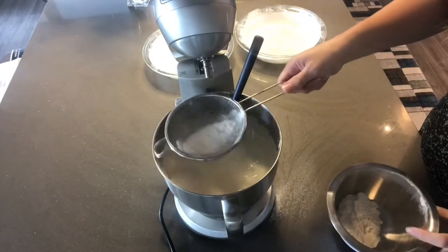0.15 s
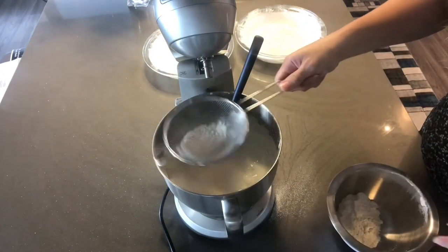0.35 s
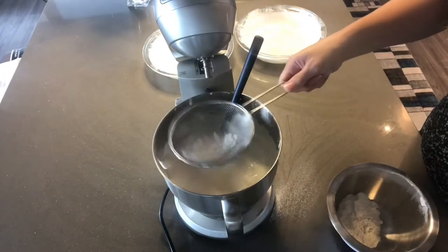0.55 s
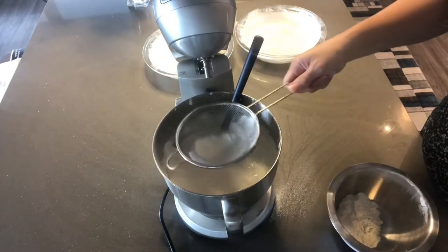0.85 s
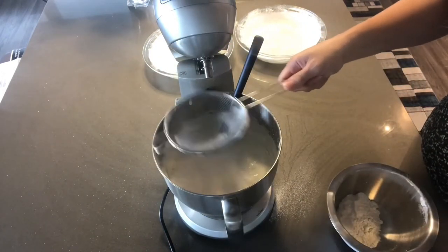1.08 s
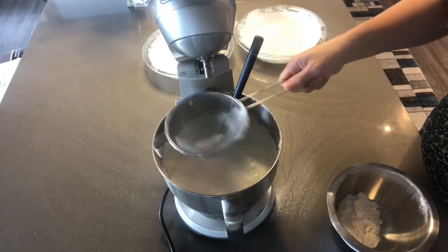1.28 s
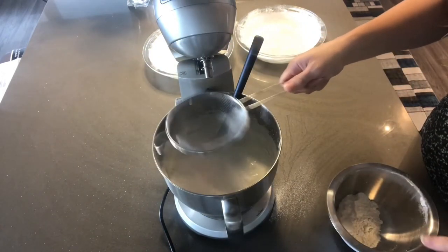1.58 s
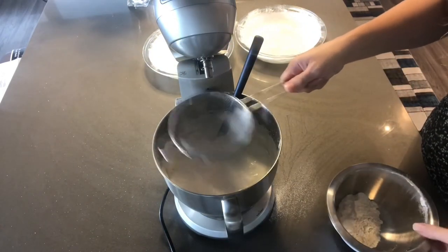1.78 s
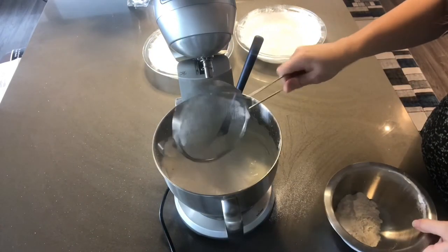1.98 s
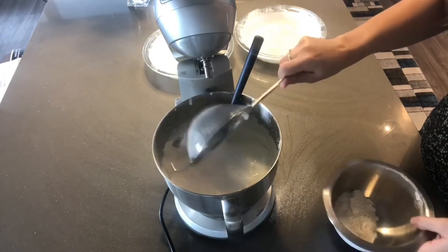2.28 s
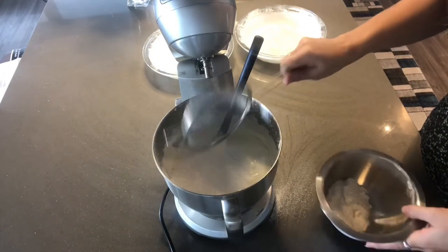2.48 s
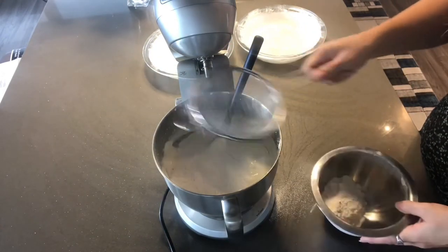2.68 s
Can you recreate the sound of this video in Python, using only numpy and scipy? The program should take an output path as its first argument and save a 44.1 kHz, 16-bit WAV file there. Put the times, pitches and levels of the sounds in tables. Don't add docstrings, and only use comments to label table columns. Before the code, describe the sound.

A metal sieve rim clacks hard on a steel mixing bowl, after very faint flour hiss and one lighter ring; a small bowl then slides and knocks on the worktop in a quiet, echoing kitchen, closely miked.

```python
import sys
import numpy as np
from scipy import signal
from scipy.fft import rfft, irfft
from scipy.io import wavfile
from scipy.ndimage import uniform_filter1d

SR = 44100
rng = np.random.default_rng(int(sys.argv[2]) if len(sys.argv) > 2 else 0)


def level_to_linear(level):
    exponent = np.asarray(level, float) / 20
    return 10 ** exponent


def wrap_up_sound(samples):
    columns = np.atleast_2d(samples).T
    tamed = np.clip(columns, -1, 1)
    steps = np.round(tamed * 32767).astype(np.int16)
    wavfile.write(sys.argv[1], SR, steps)


N = 125685

# [f/Hz, level/dB]
AIR_COLOUR = [(70, -3.5), (300, -4.5), (600, -12), (1400, -24.5), (7800, -32.5), (8300, -34.5),
              (14800, -39), (16200, -48.5)]
# [f/Hz, width/Hz, level/dB]
HUMS = [(124.76, 8.2, -66), (176.3, 9.2, -79), (271.1, 44, -65), (351.1, 73, -67.5),
        (405.06, 20, -67.5), (448.03, 16, -66.5), (853.9, 16, -72.5)]
# [f/Hz, time to fall 60 dB/s]
ROOM_ECHO = [(200, 0.32), (700, 0.527), (1400, 0.496), (2800, 0.468), (4000, 0.629), (6000, 0.387),
             (9000, 0.3), (14000, .2)]
# [t/s, level/dB, length/s, f/Hz, width/Hz]
BRUSHES = [
    (1.164, -63, 0.021, 5240, 2500),
    (1.429, -58.5, 0.0322, 3450, 6500),
    (1.852, -59.5, 0.0158, 2200, 1200),
    (1.918, -52, .012, 1990, 1400),
    (1.919, -58.5, .015, 5000, 4530),
]
# [t/s, level/dB, f/Hz, time to fall 60 dB/s]
TOUCHES = [
    (1.778, -59.5, 5400, 0.068),
    (1.78, -59, 5670, .05),
    (1.85, -47.5, 727.4, 0.098),
    (1.922, -49, 770.7, 0.1065),
    (2.81, -65, 4150, 0.051),
]
# [t/s, level/dB, f/Hz, time to fall 60 dB/s]
KNOCKS = [
    (2.618, -33, 1900, 0.013),
    (2.6203, -17.5, 510, 0.002),
    (2.625, -26, 1780, 0.004),
    (2.6253, -51, 3700, 0.0055),
    (2.619, -35, 1143, 0.0243),
    (2.6272, -31, 700, 0.0141),
    (2.628, -36, 1500, 0.0225),
    (2.6443, -33, 150, 0.0382),
]
# [t/s, level/dB, contact/ms]
SIEVE_HITS = [
    (1.7334, -28, 0.066),
    (1.7365, -56, 0.069),
    (1.754, -80.5, .1),
    (1.78, -54, 0.16),
]
# [f/Hz, level/dB, time to fall 60 dB/s]
SIEVE_MODES = [(546.2, -0.5, 0.021), (860, 1.5, 0.034), (947.3, 1, 0.0492), (1159, -4, 0.0695),
               (1468.4, -8.5, 0.165), (1884, -0.5, 0.0244), (3068, -7, 0.0287), (4012, 1.5, 0.067),
               (4620, -2, 0.033), (5300, -1.5, 0.034), (6384, -5, 0.0194), (8300, -0.5, 0.044),
               (9882, 2, 0.045), (10046, 3.5, 0.0236)]
# [t/s, level/dB, contact/ms]
CLACK_HITS = [
    (2.4065, -52.5, 0.073),
    (2.4291, -3, 0.044),
    (2.4308, -16, 0.19),
    (2.4378, -16, .1),
]
# [f/Hz, level/dB, time to fall 60 dB/s]
RIM_MODES = [(2708, -6.5, 0.033), (3538, -5.5, 0.0218), (4281, 1, 0.01877), (4744, -6.5, .015),
             (4975, 3, 0.0064), (5710, 7.5, 0.005), (7032, 6.5, 0.005), (7725, -6, 0.0225),
             (8804, -7, 0.0078), (9910, -4, 0.011), (11253, -18, 0.0045), (13190, -7, 0.0049),
             (14000, -17, 0.012), (15850, -12.5, 0.019)]
# [f/Hz, level/dB, time to fall 60 dB/s]
BODY_MODES = [(150, -29, 0.11), (470, -22, 0.13), (678, -28.5, 0.099), (728.8, -11.5, 0.058),
              (949.7, -34.5, .03), (1245, -20.5, 0.12), (1353.2, -6, 0.06), (1611, -33.5, 0.12),
              (1900, -22.5, 0.029), (2210, -8, 0.016)]
# [f/Hz, width/Hz, level/dB, time to fall 60 dB/s]
CRACK_BANDS = [(1500, 1600, -30.5, 0.055), (5000, 8600, -14, 0.012), (13500, 5200, -29.5, 0.0076)]
# [f/Hz, level/dB, time to fall 60 dB/s]
CLICK_MODES = [(700, -15, 0.01), (1500, -13, 0.012), (3132, 1, 0.0013), (4630, 3.5, 0.0011),
               (7190, 0, 0.0012), (9970, -1, 0.00072), (14500, -15, 0.0019)]


def unit(x):
    return x / np.sqrt(np.mean(x ** 2))


def band(hz, width_hz, order=1):
    f = np.fft.rfftfreq(N, 1 / SR) + 1
    distance = (f - hz * hz / f) / width_hz
    noise = rfft(rng.standard_normal(N))
    return unit(irfft(noise / (1 + distance ** (2 * order)), N))


def fade(t, t60):
    return (t >= 0) * np.exp(-np.log(1000) * np.maximum(t, 0) / t60)


def walk(rate):
    k = int(SR / rate)
    steps = np.repeat(rng.standard_normal(N // k + 1), k)
    return 2.4 * uniform_filter1d(uniform_filter1d(steps, k), k)[:N]


def ring(modes):
    t = np.arange(SR // 2) / SR
    return sum((-1) ** k * level_to_linear(db) * fade(t, t60) * np.sin(2 * np.pi * hz * t)
               for k, (hz, db, t60) in enumerate(modes))


def crowd(modes, spread, near_db):
    count = 5
    chance = rng.uniform(-0.76, 1, (len(modes), count, 2))
    steps = np.linspace(-1, 1, count)
    near = []
    for (hz, db, t60), row in zip(modes, chance):
        for j, (shift, lift) in enumerate(row):
            if j != count // 2:
                near_hz = hz * (1 + spread * (steps[j] * 2 + shift / count))
                near.append((near_hz, db + near_db + 3.283 * lift, t60 * 0.624))
    return ring(modes) + ring(near)


def strike(contacts, body):
    t = np.arange(N) / SR
    push = sum(level_to_linear(db) * np.exp(-((t - s) * 4000 / ms) ** 2) / (ms * SR / 2000) for s, db, ms in contacts)
    return signal.fftconvolve(push, body)[:N] / 2


def short_notes(t, rows):
    return sum(level_to_linear(db) * fade(t - s, t60) * np.sin(2 * np.pi * hz * (t - s)) for s, db, hz, t60 in rows)


def kitchen():
    f = np.log(np.fft.rfftfreq(N, 1 / SR) + 1)
    hz, db = np.transpose(AIR_COLOUR)
    air = irfft(rfft(rng.standard_normal(N)) * level_to_linear(np.interp(f, np.log(hz), db)), N)
    drone = sum(level_to_linear(level + 0.58 * walk(2.2)) * band(pitch, width) for pitch, width, level in HUMS)
    return level_to_linear(-55.5) * unit(air) + drone


def room(x):
    gap_s, tilt_db, level_db = 0.0044, -1.5, -9.5
    t = np.arange(N) / SR
    table_hz, table_t60 = np.transpose(ROOM_ECHO)
    tail = 0
    for k, hz in enumerate(140 * 2 ** np.arange(0, 7.5, .5)):
        t60 = np.interp(np.log(hz), np.log(table_hz), table_t60)
        tail = tail + level_to_linear(tilt_db * k / 2) * np.sqrt(hz) * band(hz, hz * 0.63) * fade(t - gap_s, t60)
    tail = tail[:SR] / np.sqrt(np.sum(tail ** 2))
    return level_to_linear(level_db) * signal.fftconvolve(x, tail)[:N]


def flour(t):
    shake_hz, first_shake_s, empty_s = 6.23, 0.111, 1.006
    shake_db = 2.5 * np.cos(2 * np.pi * shake_hz * (t - first_shake_s)) + 1.12 * walk(11.4)
    left = np.clip(1 - t / empty_s, 0, 1) ** 0.76
    return level_to_linear(-73.5 + shake_db) * left * band(6500, 3160, order=2)


def touches(t):
    scratches = 0
    for s, db, length, hz, width in BRUSHES:
        onset = np.clip((t - s) / 0.0026, 0, 1)
        scratches = scratches + level_to_linear(db) * band(hz, width, order=2) * fade(t - s, 6.23 * length) * onset
    return short_notes(t, TOUCHES) + scratches


def slide(t):
    start_s = 2.44
    swell = np.clip((t - start_s) / 0.013, 0, 1) * fade(t - start_s, 1.8)
    return level_to_linear(-44.5 + 1.0 * walk(30)) * swell * band(126, 170)


def small_bowl(t):
    return short_notes(t, KNOCKS)


def sieve(t):
    modes = [(hz, db, t60 if hz < 4300 else min(t60, .04)) for hz, db, t60 in SIEVE_MODES]
    fizz = level_to_linear(-47.5) * band(14610, 1600, order=2) * fade(t - SIEVE_HITS[0][0], 0.08)
    return strike(SIEVE_HITS, crowd(modes, spread=0.037, near_db=-7)) + fizz


def click():
    modes = [(hz, db, min(t60, .008)) for hz, db, t60 in CLICK_MODES]
    return strike(CLACK_HITS[1:2], ring(modes))


def crack(t):
    return sum(level_to_linear(db) * band(hz, width, order=2) * fade(t - CLACK_HITS[1][0], t60)
               for hz, width, db, t60 in CRACK_BANDS)


def clack():
    body_lag_s, body_rise_ms, body_db = 0.0017, 0.73, -6.5
    body = crowd(BODY_MODES, spread=0.05133, near_db=-4)
    body = body * (1 - np.exp(-np.arange(len(body)) / SR * 1000 / body_rise_ms))
    damped = [(hz, db, min(t60, .024)) for hz, db, t60 in RIM_MODES]
    rim = crowd(damped, spread=.03, near_db=-4)
    body_hit = (CLACK_HITS[1][0] + body_lag_s, body_db, .1)
    return strike(CLACK_HITS, rim) + strike([body_hit], body)


def scene():
    t = np.arange(N) / SR
    rim = clack() + crack(t)
    mesh = sieve(t)
    small = small_bowl(t) + touches(t)
    to_walls = level_to_linear(-9) * rim + level_to_linear(15) * click() + level_to_linear(2.5) * mesh + level_to_linear(-2.5) * small
    return (rim + mesh + small + room(to_walls) + slide(t) + flour(t) + kitchen())[None]


def band_limit(x):
    return signal.sosfilt(signal.butter(12, 16650, fs=SR, output="sos"), x)


def record(dry):
    low_cut_hz, top_hz = 46.6, 16600
    x = signal.sosfilt(signal.butter(4, low_cut_hz, "high", fs=SR, output="sos"), dry)
    x = signal.sosfilt(signal.butter(8, top_hz, fs=SR, output="sos"), x)
    return band_limit(np.clip(x, -1, 1))


dry = scene()
out = record(dry)
wrap_up_sound(out)
```